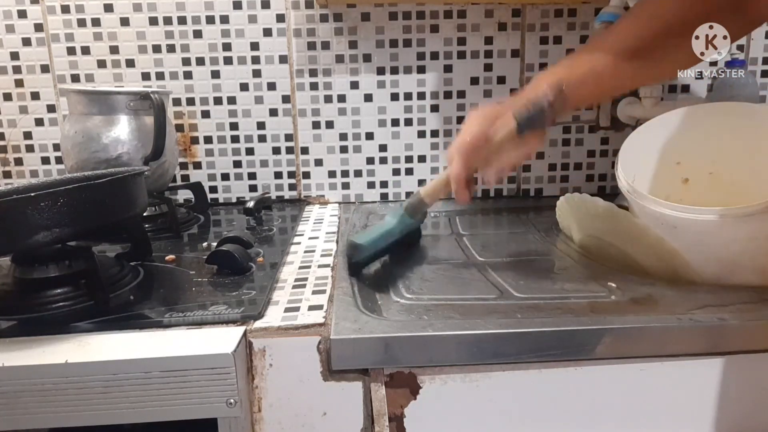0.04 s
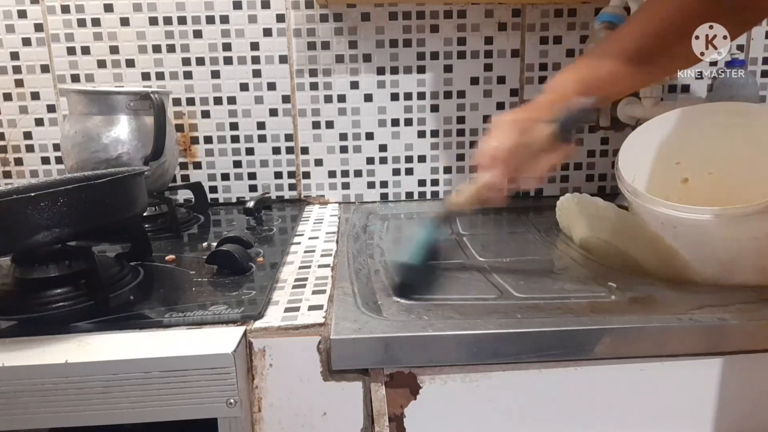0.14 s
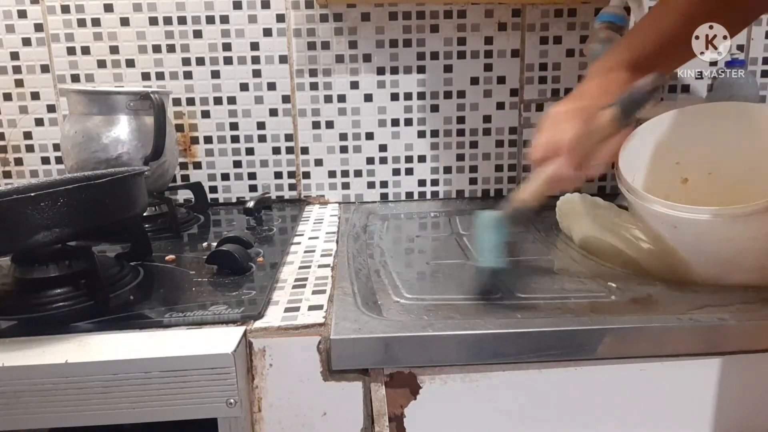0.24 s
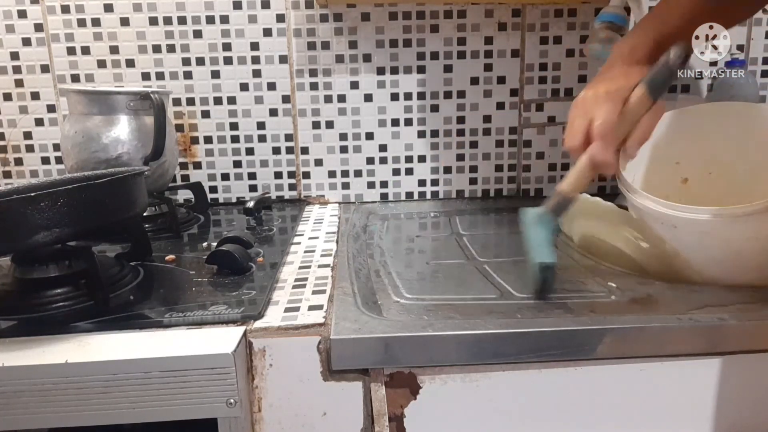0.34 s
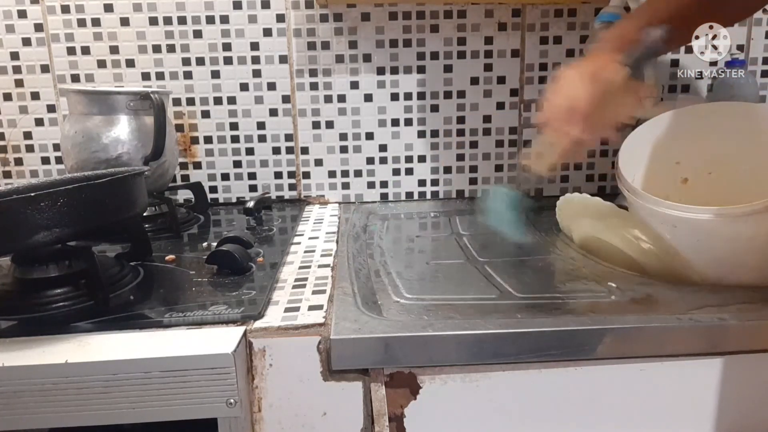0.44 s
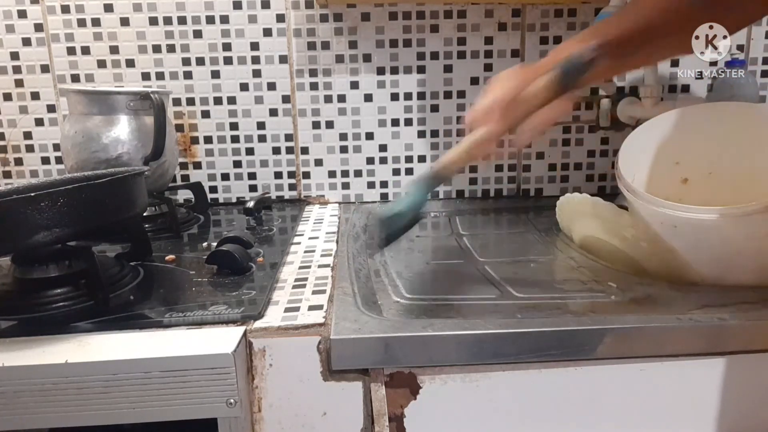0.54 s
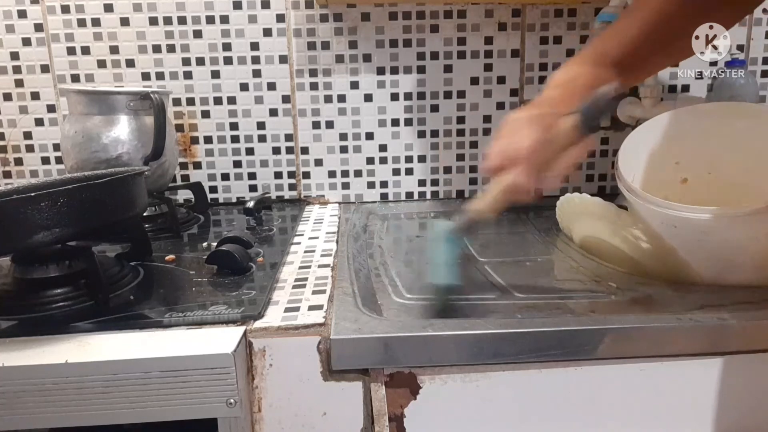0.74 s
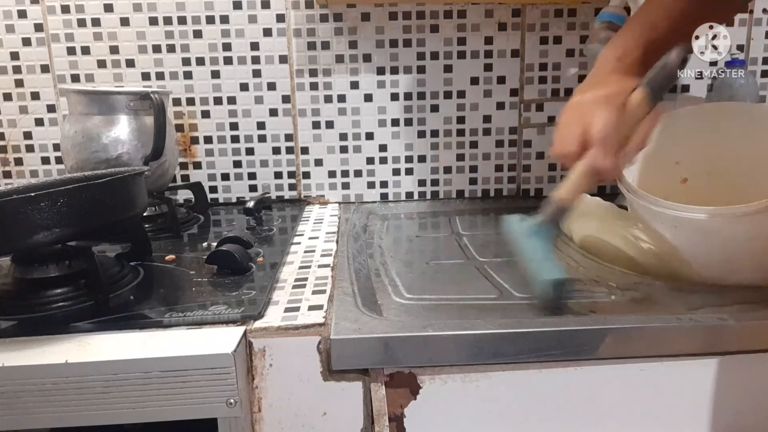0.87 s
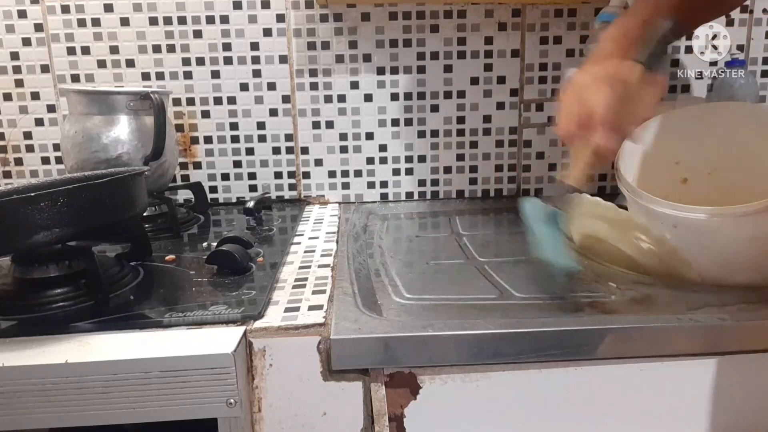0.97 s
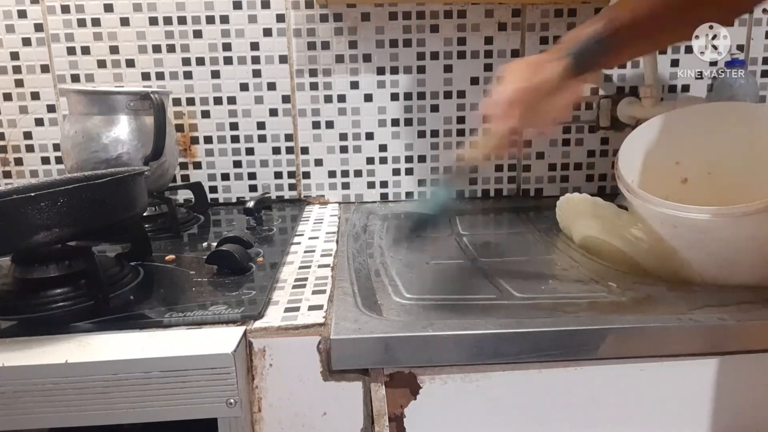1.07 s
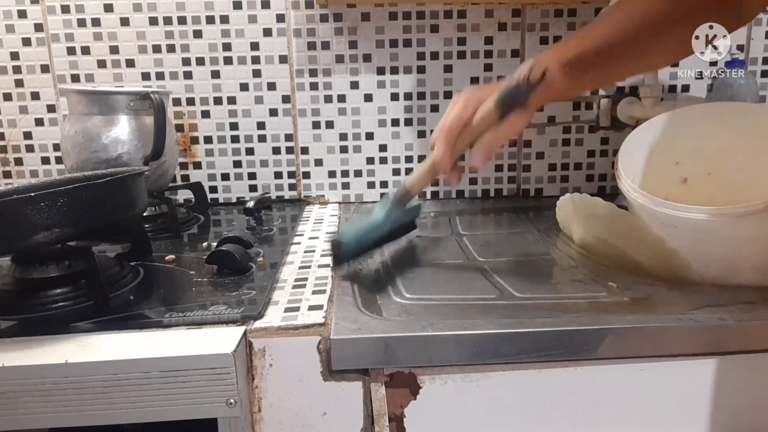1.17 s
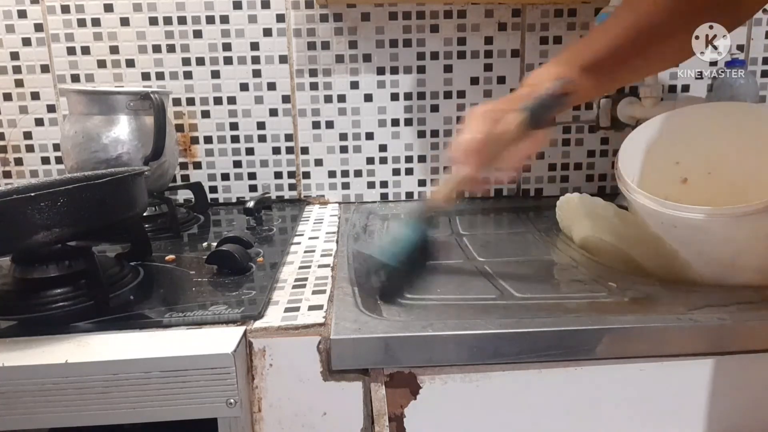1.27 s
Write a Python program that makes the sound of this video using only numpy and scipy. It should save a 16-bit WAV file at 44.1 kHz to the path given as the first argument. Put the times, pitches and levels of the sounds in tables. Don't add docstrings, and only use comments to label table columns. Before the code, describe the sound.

A rubber squeegee squeaks and scrapes in two quick strokes across a wet steel drainboard.

```python
import sys
import numpy as np
from scipy import signal
from scipy.fft import rfft, irfft
from scipy.io import wavfile
from scipy.ndimage import uniform_filter1d

SR = 44100
rng = np.random.default_rng(int(sys.argv[2]) if len(sys.argv) > 2 else 0)


def to_linear_factor(level_db):
    exponent = np.asarray(level_db, float) / 20
    return 10 ** exponent


def dump(signal):
    limited = np.clip(np.atleast_2d(signal).T, -1, 1)
    pcm = np.round(limited * 32767).astype(np.int16)
    wavfile.write(sys.argv[1], SR, pcm)


N = 57330


def evened(x):
    return x / np.sqrt(np.mean(x ** 2) + 1e-20)


def read(points, hz):
    f, value = np.transpose(points)
    return np.interp(np.log(hz + 1), np.log(f + 1), value)


def add(mix, start_s, sound):
    part = mix[..., round(start_s * SR):][..., :sound.shape[-1]]
    part += sound[..., :part.shape[-1]]


def curve(table):
    t, rows = np.arange(N) / SR, np.transpose(table)
    inside_s = np.minimum(t - rows[0, 0], rows[0, -1] - t)
    gate = np.clip(inside_s / .006, 0, 1)
    return gate, [np.interp(t, rows[0], row) for row in rows[1:]]


def colour(x, spectrum):
    hz = np.fft.rfftfreq(N, 1 / SR)
    return irfft(rfft(x) * to_linear_factor(read(spectrum, hz)) * (hz < 15700), N)


def noise(spectrum, patchy_db):
    # frequency_hz, coherence [0..1]
    likeness = [(100, 1), (400, 0.23), (1000, 1), (3000, 0.1)]
    frames, hz = N // 64 + 5, np.fft.rfftfreq(256, 1 / SR)
    a, b, c, d, patch = rng.standard_normal((frames, 129, 5)).T
    patch = uniform_filter1d(patch, size=6, axis=0)
    patch = evened(uniform_filter1d(patch, size=8, axis=1))
    same = np.clip(read(likeness, hz), -1, 1)[:, None]
    left = a + 1j * b
    right = same * left + np.sqrt(1 - same ** 2) * (c + 1j * d)
    z = np.array([left, right]) * to_linear_factor(patchy_db * patch)
    white = signal.istft(z, nperseg=256, noverlap=192)[1][:, :N]
    return evened(colour(white, spectrum))


def turns_of(hz):
    wobble, wobble_s = .002, .004
    wander = uniform_filter1d(rng.standard_normal(len(hz)), max(int(wobble_s * SR), 2))
    return 2 * np.pi * np.cumsum(hz * (1 + wobble * evened(wander))) / SR


def air():
    # frequency_hz, density_db
    air_spectrum = [(25, -11), (60, -9), (90, 6), (200, -11.5), (290, -6), (1300, -19), (3500, -24),
                    (15500, -25.5)]
    return to_linear_factor(-72.5) * noise(air_spectrum, 1.1)


def kitchen(x):
    # frequency_hz, t60_s
    room_t60 = [(200, .25), (1000, .2), (4000, .18), (12000, .13)]
    taps, slots = np.zeros((2, SR // 2)), np.arange(200, SR // 2 - 20, 20)
    at = slots + rng.integers(0, 20, (2, len(slots)))
    np.put_along_axis(taps, at, rng.choice([-1., 1.], at.shape), 1)
    hz, t, z = signal.stft(taps, SR, nperseg=256)
    decay = to_linear_factor(-60 * t / read(room_t60, hz)[:, None])
    tail = signal.istft(z * decay, SR, nperseg=256)[1]
    tail = tail / np.linalg.norm(tail[0])
    return to_linear_factor(-16) * signal.fftconvolve(x[None], tail, axes=1)[:, :N]


def water():
    # start_s, level_db, rise_s, t60_s
    flicks = [
        (0.562, -60, .012, 0.39),
        (1.012, -61.5, 0.025, 0.26),
        (.482, -74.5, 0.013, 0.7),
        (.66, -77.5, 0.02, 0.6),
        (.69, -71, .02, 0.93),
        (1.125, -85, .02, 0.28),
    ]
    # frequency_hz, density_db
    spray = [(1500, -24), (2300, -9), (3600, -1.5), (4600, -6), (6200, -3.5), (8800, -10), (12000, -9.5),
             (15500, -13.5)]
    level, drop, t = np.zeros(N), np.zeros(N), np.arange(0, .25, 1 / SR)
    for start_s, level_db, rise_s, t60_s in flicks:
        rise = np.minimum(t / rise_s, 1) ** 2
        add(level, start_s, rise * to_linear_factor(level_db - 60 * np.maximum(t - rise_s, 0) / t60_s))
    ring = to_linear_factor(-54 - 60 * t / .012) * np.sin(2 * np.pi * 12400 * t)
    add(drop, .4995, ring * (1 + 0.46 * rng.standard_normal(len(t))))
    return level * noise(spray, 1.6) + drop


def panel(damp):
    # pitch_hz, level_db, t60_s
    modes = [(295, -6, .15), (433, -8, .2), (590, -3, .2), (800, -12, .1), (955, -6, .25), (1100, -11, .12)]
    t = np.arange(SR // 4) / SR
    return sum(to_linear_factor(db - 60 * t / (t60_s * damp)) * np.sin(2 * np.pi * hz * t) for hz, db, t60_s in modes)


def bumps():
    # start_s, knock_db, crack_db
    landings = [
        (0.0926, -54.5, -73.5),
        (0.113, -66, -82.5),
        (0.7417, -84, -66),
    ]
    tail_t60_s, rise_s = .08, .003
    out, t = np.zeros(N), np.arange(0, .25, 1 / SR)
    dull = signal.butter(2, 2400, fs=SR)
    rattles = np.minimum(t / rise_s, 1) * rng.standard_normal((len(landings), len(t)))
    for (start_s, knock_db, crack_db), rattle in zip(landings, rattles):
        push = rattle * to_linear_factor(-240 * t / tail_t60_s)
        knock = signal.oaconvolve(push, panel(0.22))[:len(t)]
        crack_decay = to_linear_factor(-400 * t / tail_t60_s) + to_linear_factor(-12.0 - 60 * t / tail_t60_s)
        crack = signal.lfilter(*dull, rattle) * crack_decay
        add(out, start_s, 2 * to_linear_factor(knock_db) * knock / abs(knock).max() + 2 * to_linear_factor(crack_db + 13.5) * crack)
    return out


def strokes():
    # time_s, speed as hiss_db, pressure on the panel re speed_db
    paths = [
        [(.09, -67, 3), (.15, -73.5, -1.5), (.163, -64, -8.5), (.2, -58, 1), (.25, -53, -12.5),
         (.3, -48.5, 4.5), (.36, -55, 5), (.41, -62.5, 0.5), (.485, -79.5, -8.5)],
        [(.725, -80, 1.5), (.738, -64.5, -5.5), (.745, -58, 4), (.762, -60, 6.5), (.82, -55.5, -12),
         (.865, -54.5, -0.5), (.904, -51, 7.5), (.96, -57.5, 2), (1.03, -73, 1.5)],
        [(1.242, -71.5, 6.5), (1.265, -76, 4.5), (1.31, -75, 4.5)],
    ]
    # frequency_hz, density_db
    hiss = [(700, -30), (1300, -7), (2200, 2.5), (3000, -3.5), (6200, -5.5), (9000, -11), (12400, -11.5),
            (15500, -14.5)]
    scrape = [(60, -20), (150, -9), (330, -1), (500, -6.5), (800, -11), (1100, -13.5), (1600, -20.5),
              (2300, -37)]
    slips_per_s = 320
    speed, press = np.zeros(N), np.zeros(N)
    for path in paths:
        gate, (speed_db, press_db) = curve(path)
        speed += gate * to_linear_factor(speed_db)
        press += gate * to_linear_factor(speed_db + press_db)
    strength = to_linear_factor(1.8 * np.minimum(rng.exponential(1, N), 4))
    slips = strength * (rng.random(N) < slips_per_s / SR) * rng.choice([-1, 1], N)
    rung = evened(signal.oaconvolve(slips, panel(.2))[:N])
    rub = speed * noise(hiss, 1.5) + press * to_linear_factor(2.5) * noise(scrape, 2.8)
    return rub, press * to_linear_factor(-5) * rung


def chatter():
    # peak_s, pitch_hz, peak_db, length_s
    skips = [(.277, 2230, -35, .013), (.285, 2220, -37, .012), (.295, 2220, -45, .009),
             (.302, 2230, -45, .011), (.312, 2200, -44, .013), (.324, 2240, -53, .012),
             (.287, 1150, -36, .013), (.3, 1090, -37, .016), (.31, 1060, -47, .01), (.321, 625, -40, .028),
             (.298, 560, -45, .014), (.341, 560, -48, .016), (.353, 520, -50, .012), (.347, 980, -44, .014),
             (.335, 950, -50, .012), (.392, 950, -55, .014), (.881, 1120, -25, .016),
             (.897, 1100, -30, .014), (.878, 2170, -29, .013), (.89, 2190, -32, .014),
             (.901, 2150, -41, .011), (.911, 2140, -40, .012), (.92, 2105, -38.5, .012),
             (.927, 1955, -39, .018), (.913, 1120, -43, .008), (.923, 980, -33, .02),
             (.941, 985, -29.5, .017), (.955, 1000, -35, .012), (.969, 955, -42, .014),
             (.905, 290, -40, .018), (.297, 290, -46, .02), (.356, 270, -47, .02), (.887, 1330, -46, .016),
             (.885, 2450, -48, .012), (.899, 2380, -50, .01), (.909, 520, -46, .012),
             (.926, 320, -50, .014), (.958, 330, -53, .014), (.904, 1500, -52, .012)]
    ring_s, pitch_spread = .04, .03
    out, luck = np.zeros(N), rng.random((len(skips), 2))
    for (peak_s, hz, db, length_s), (phase, bend) in zip(skips, luck):
        t = np.arange(0, length_s + ring_s, 1 / SR)
        swell = np.sin(np.pi * np.minimum(t / length_s, 1)) ** 2
        ring = to_linear_factor(-4.0 - 60 * np.abs(t - length_s / 2) / ring_s) * (t > length_s / 2)
        pitch_hz = hz * (1 + pitch_spread * (bend - .5) * (t / length_s - .5))
        tone = np.sin(turns_of(pitch_hz) + 2 * np.pi * phase)
        add(out, peak_s - length_s / 2, np.sqrt(2) * to_linear_factor(db) * np.maximum(swell, ring) * tone)
    return out


def beads(depth_db):
    flicker = uniform_filter1d(rng.standard_normal(N), max(int(.006 * SR), 2))
    return to_linear_factor(depth_db * evened(flicker))


def squeaks():
    # time_s, pitch_hz, level_db, overtone_db
    low_squeak = [(.174, 589, -70, -95), (.188, 592, -46.5, -80), (.197, 598, -45, -66),
                  (.207, 600, -31.5, -52), (.22, 603, -24.5, -45), (.236, 607, -21.5, -42.5),
                  (.257, 612, -24.5, -42), (.284, 615, -34, -49), (.293, 612, -50, -60)]
    # multiple, level_db, flicker_db
    low_orders = [(2, 0, 1), (3, -10, 2.5), (4, -7.5, 3.5), (5, -20, 4), (6, -21, 4)]
    # time_s, pitch_hz, level_db, octave_db, third_partial_db
    high_squeak = [(.796, 1023, -62, -75, -85), (.804, 1026, -50, -56, -75), (.812, 1027, -45, -45.5, -60),
                   (.829, 1031, -35, -36.5, -53), (.848, 1041, -36.5, -26.5, -55),
                   (.861, 1054, -35.5, -24, -51), (.868, 1060, -34, -27, -52), (.875, 1075, -38, -46, -58)]
    # start_s, length_s, pitch_hz, glide_hz, level_db
    dragged = [(.235, .08, 1030, 70, -49), (.83, .07, 605, 0, -48), (.958, .05, 950, 10, -50),
               (1.005, .05, 990, 10, -61), (.925, .09, 2125, -20, -55), (.965, .045, 1975, 0, -61),
               (.775, .04, 590, 40, -55), (.75, .035, 290, 70, -51), (.0935, .006, 950, -200, -57),
               (.712, .09, 88, 0, -50), (1.03, .075, 85, 0, -63), (.18, .03, 320, 10, -58),
               (.32, .08, 950, 0, -58), (.868, .035, 3200, 130, -54), (.105, .05, 75, 0, -68),
               (.245, .035, 3060, 20, -60), (.156, .016, 4400, 0, -73), (.255, .04, 1300, 60, -52)]
    gate, (hz, db, over_db) = curve(low_squeak)
    angle = turns_of(hz)
    low = to_linear_factor(db) * np.sin(angle)
    for k, order_db, flicker_db in low_orders:
        low += to_linear_factor(over_db + order_db) * beads(flicker_db) * np.sin(k * angle)
    out = gate * low
    gate, (hz, db, octave_db, third_db) = curve(high_squeak)
    angle = turns_of(hz)
    high = to_linear_factor(db) * np.sin(angle) + to_linear_factor(octave_db) * np.sin(2 * angle)
    high += to_linear_factor(third_db) * beads(1.5) * np.sin(3 * angle)
    out += gate * high
    for start_s, length_s, hz, glide_hz, db in dragged:
        u = np.arange(0, length_s, 1 / SR) / length_s
        swell = np.sin(np.pi * u ** .75)
        add(out, start_s, to_linear_factor(db) * swell * np.sin(turns_of(hz + glide_hz * u)))
    return np.sqrt(2) * out


def scene():
    rub, rung = strokes()
    steel = squeaks() + chatter() + bumps() + rung
    wet = rub + water()
    return steel + wet + kitchen(steel + wet.mean(0)) + air()


def sway(heard):
    # low_hz, high_hz
    sway_band = [1000, 2600]
    depth, smooth = .45, int(.03 * SR)
    band = signal.butter(2, sway_band, "band", fs=SR, output="sos")
    high = signal.sosfiltfilt(band, heard.mean(0))
    drift = uniform_filter1d(uniform_filter1d(rng.standard_normal(N), smooth), smooth)
    apart = depth * evened(drift) * signal.hilbert(high).imag
    return heard + np.array([apart, -apart])


def low_pass(x):
    return signal.sosfilt(signal.butter(12, 15610, fs=SR, output="sos"), x)


def record(dry):
    # frequency_hz, level_db
    balance = [(30, 5), (80, 9), (300, 4), (600, 2.6), (1050, 1.5), (2100, 2), (5500, 2.2), (12500, -6)]
    # frequency_hz, phase_rad
    lead = [(200, .1), (605, -.4), (970, -2.3), (1045, -2), (1130, .4), (2080, -.6), (2200, .4),
            (2450, 2.2)]
    hz = np.fft.rfftfreq(2 * N, 1 / SR)
    port = to_linear_factor(read(balance, hz) / 2) * np.exp(.5j * read(lead, hz))
    middle = np.maximum(abs(port + 1 / port) / 2, .5)
    dip = 1 - .47 * np.exp(-((hz - 8550) / 550) ** 2)
    low_cut = hz ** 2 / (hz ** 2 + 52 ** 2)
    ports = np.array([port, 1 / port])
    heard = irfft(rfft(dry, 2 * N) * dip / middle * low_cut * ports, 2 * N)[:, :N]
    return low_pass(sway(heard))


dry = scene()
out = record(dry)
dump(out)
```